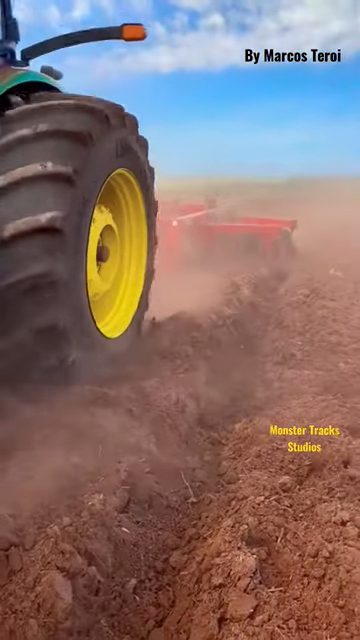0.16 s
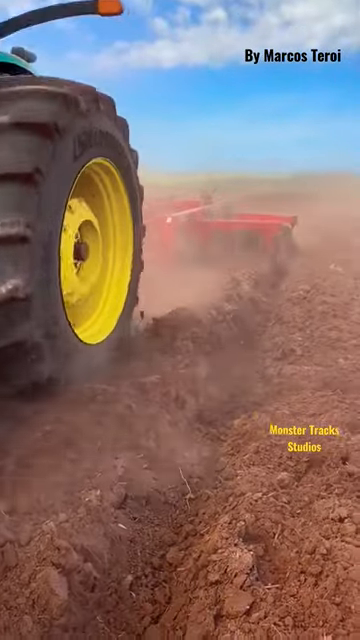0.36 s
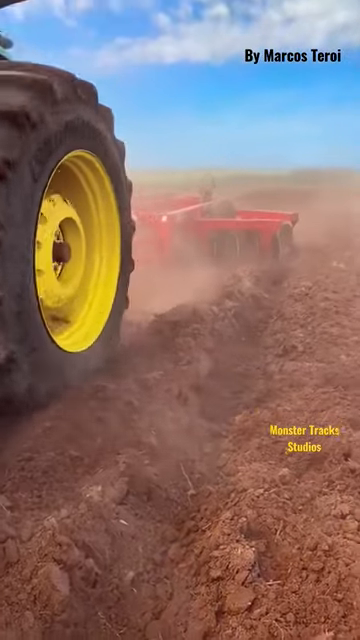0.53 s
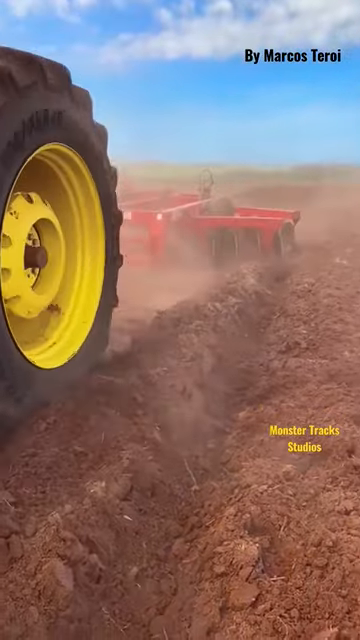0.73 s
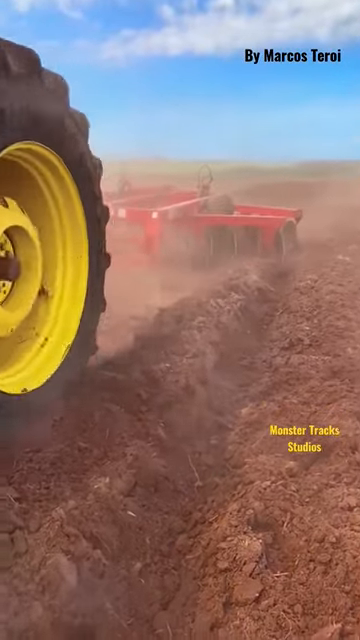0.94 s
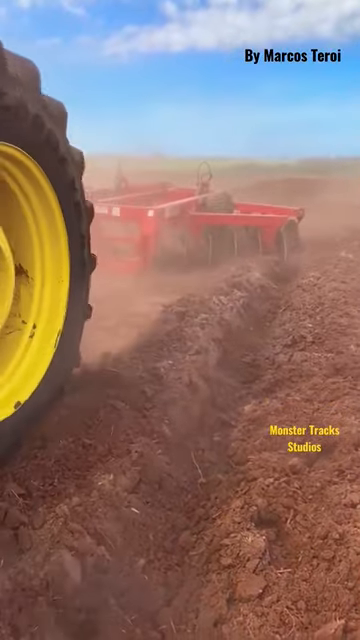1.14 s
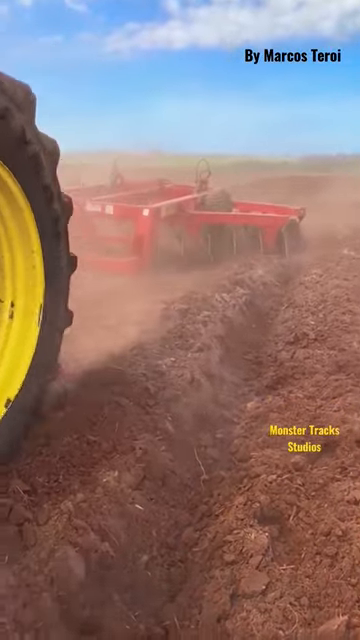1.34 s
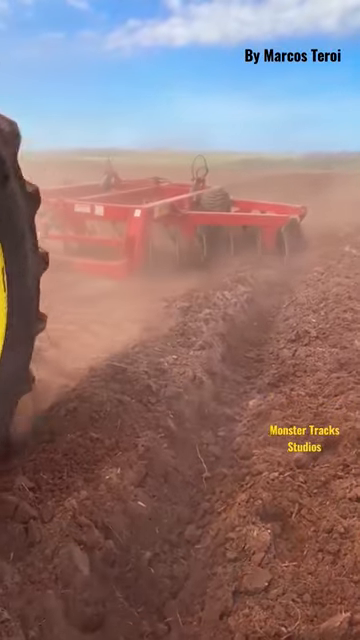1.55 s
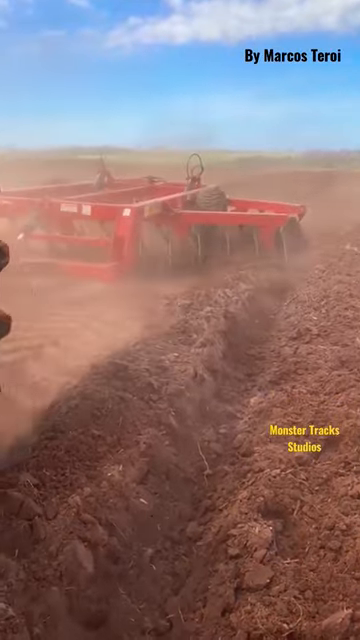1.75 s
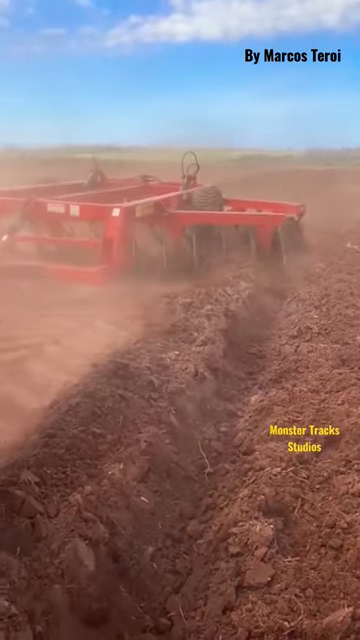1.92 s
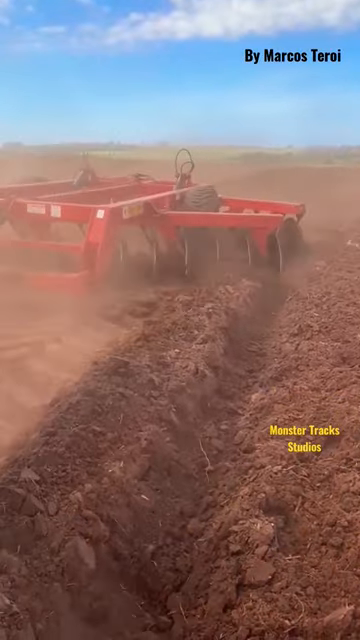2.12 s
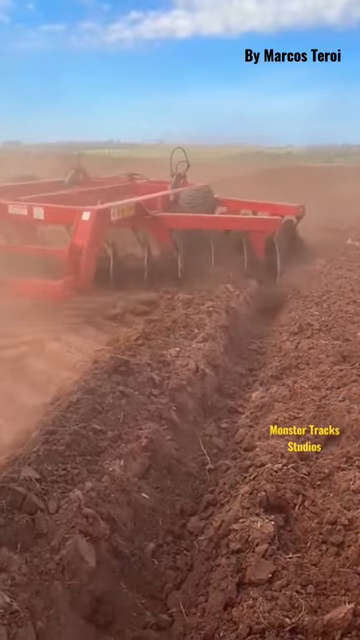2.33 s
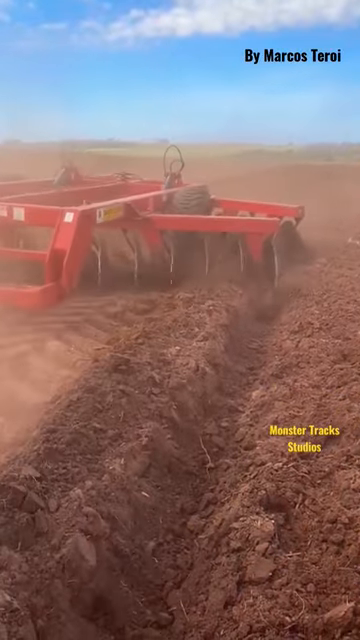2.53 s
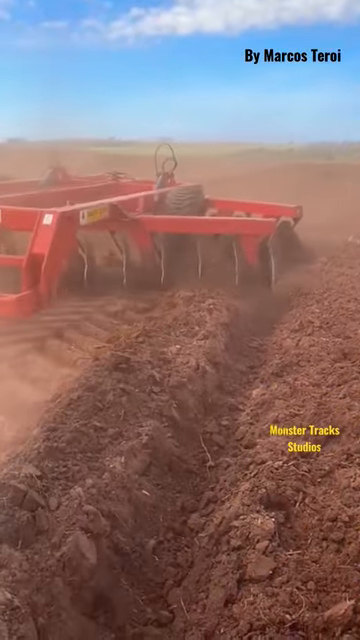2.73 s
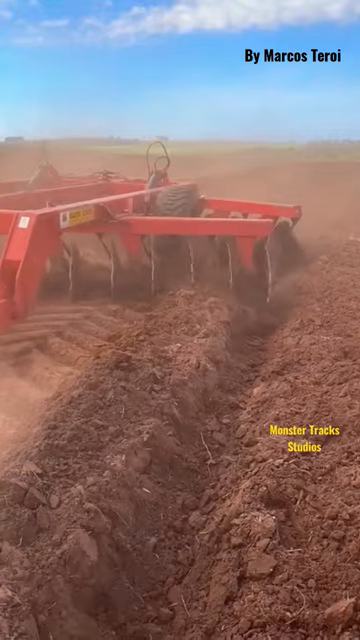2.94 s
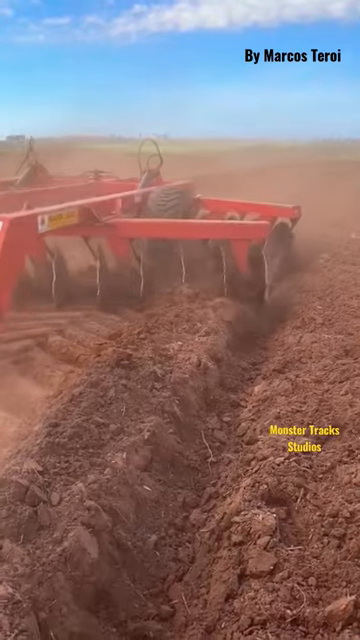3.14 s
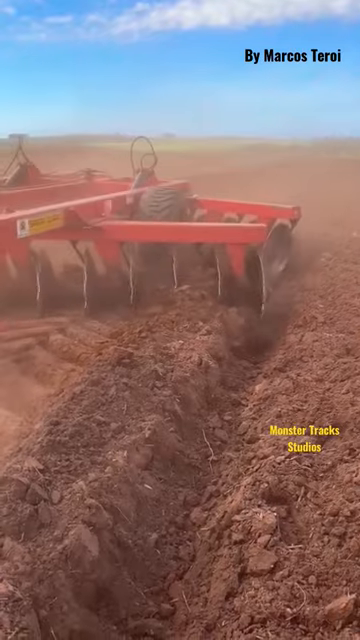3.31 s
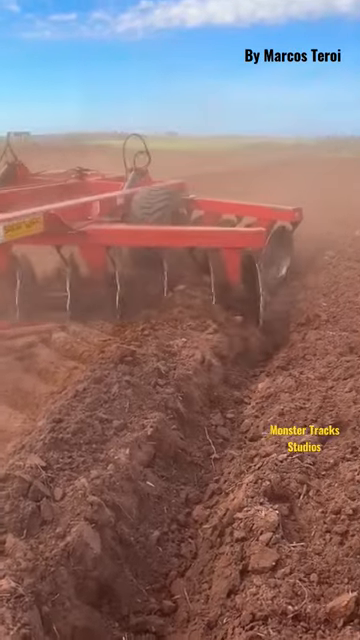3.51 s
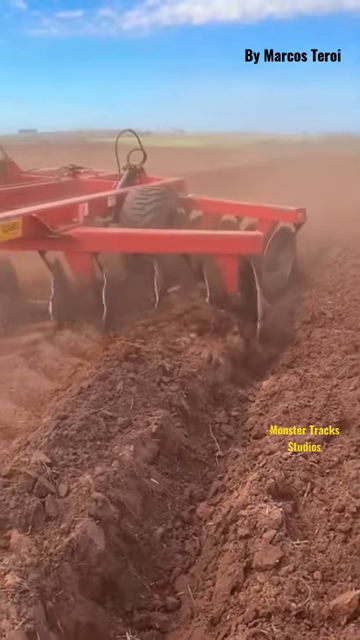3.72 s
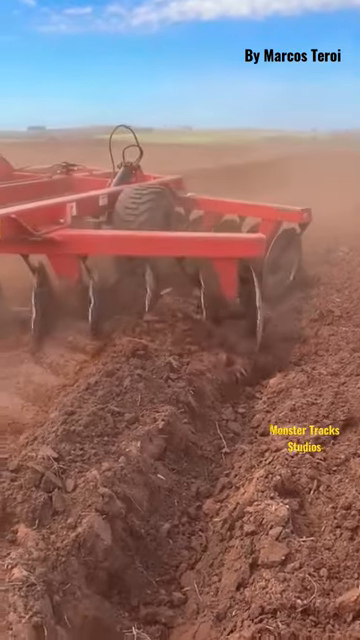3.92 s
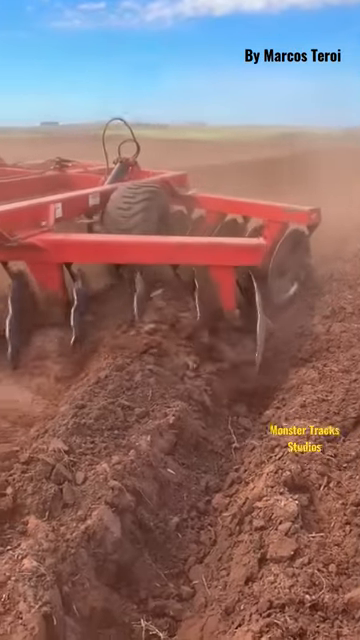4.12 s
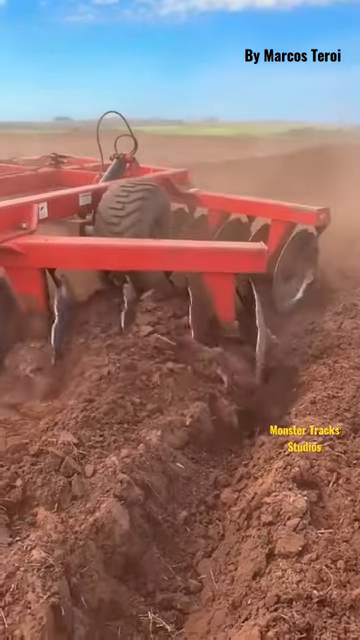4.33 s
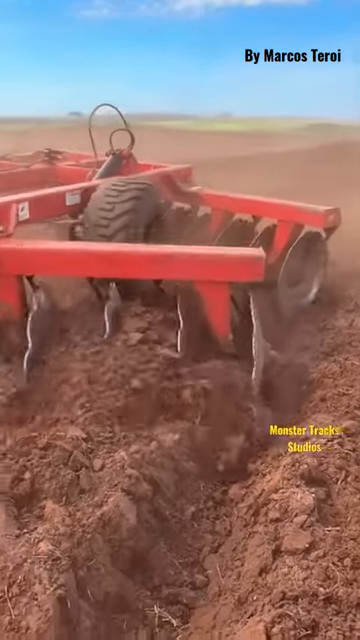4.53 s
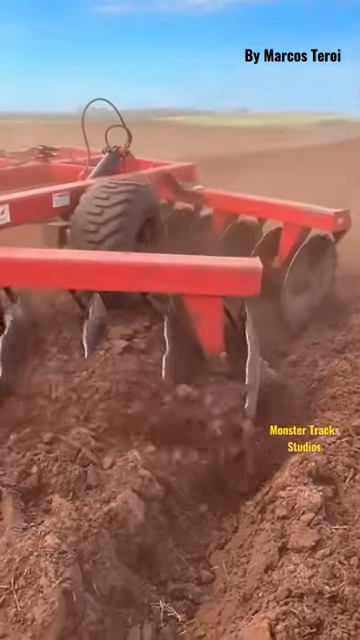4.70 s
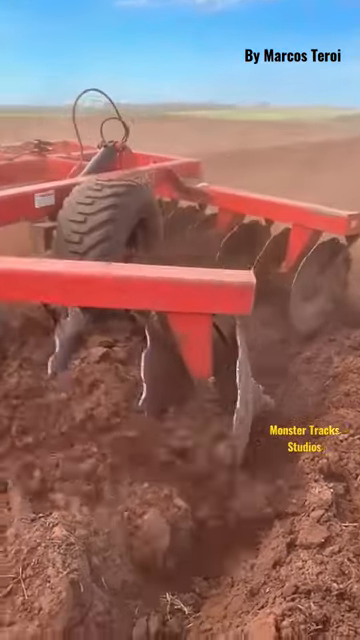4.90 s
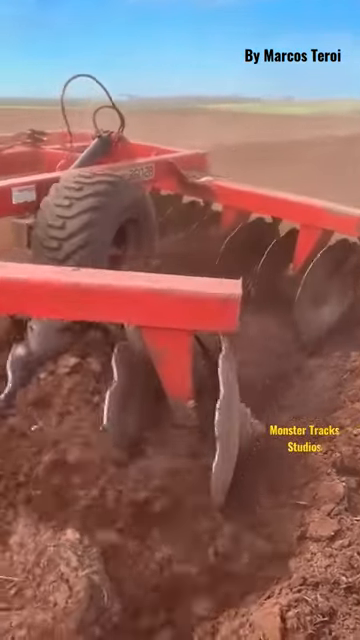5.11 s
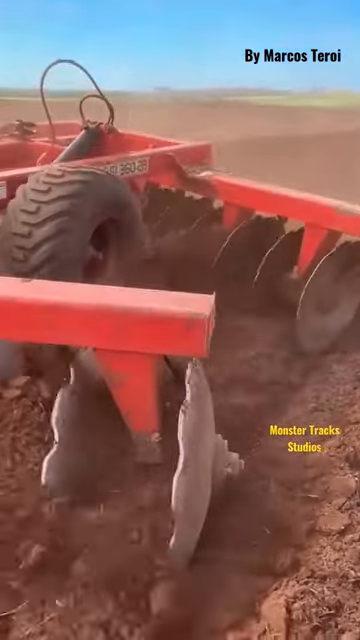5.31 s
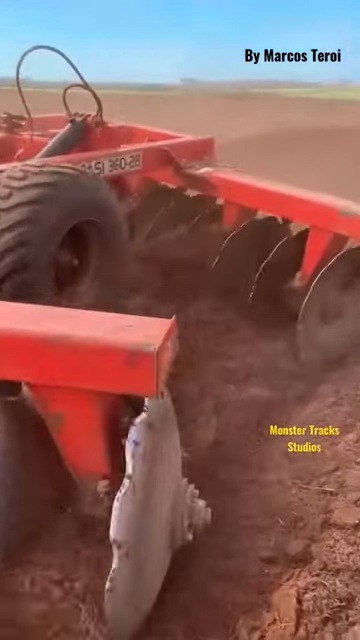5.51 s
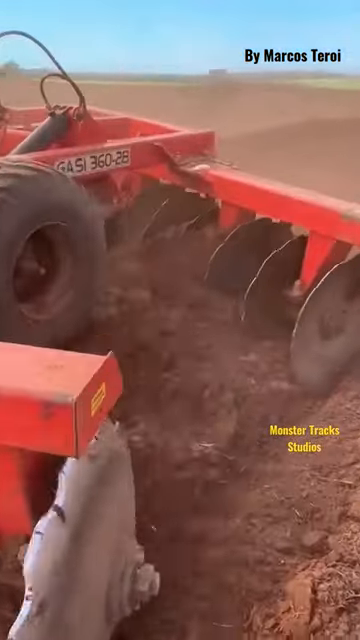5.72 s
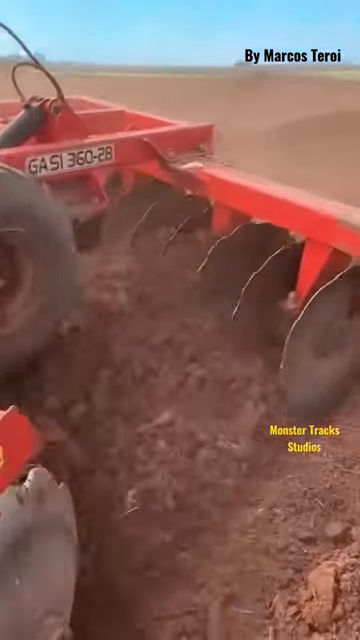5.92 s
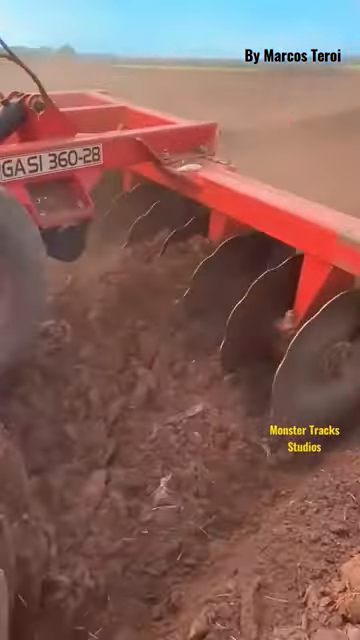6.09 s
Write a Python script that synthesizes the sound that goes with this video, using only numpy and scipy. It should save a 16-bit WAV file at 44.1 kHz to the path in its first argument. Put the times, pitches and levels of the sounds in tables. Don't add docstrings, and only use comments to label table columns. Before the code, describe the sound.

Close tractor pass-by in an open field: deep even engine drone, gear whine and metal clatter fading off, with wind buffets and a sharp clod knock.

```python
import sys
import numpy as np
from scipy import signal
from scipy.io import wavfile
from scipy.ndimage import uniform_filter1d

SR = 44100
rng = np.random.default_rng(int(sys.argv[2]) if len(sys.argv) > 2 else 0)


def dump_mix(stems):
    frames = np.atleast_2d(stems).T
    limited = np.clip(frames, -1, 1)
    pcm = np.round(limited * 32767).astype(np.int16)
    wavfile.write(sys.argv[1], SR, pcm)


def makeup_ratio(level_db):
    decades = np.asarray(level_db, float) / 20
    return 10 ** decades


N = 271214


def rms_one(x):
    return x / np.sqrt(np.mean(x ** 2) + 1e-20)


def in_time(rows):
    s, *columns = np.transpose(rows)
    return [np.interp(np.arange(N) / SR, s, c) for c in columns]


def at_hz(points, hz):
    f, value = np.transpose(points)
    return np.interp(np.log(hz), np.log(f), value)


def drift(rate):
    r = np.exp(-80 * np.pi * rate / SR)
    slow = signal.lfilter([1], [1, -2 * r, r * r], rng.standard_normal(N // 40 + 2002))[2000:]
    return np.interp(np.arange(N) / 40, np.arange(len(slow)), rms_one(slow))


def band(x, low_hz, high_hz):
    sos = signal.butter(2, [low_hz, min(high_hz, .45 * SR)], "band", fs=SR, output="sos")
    return signal.sosfilt(sos, x)


def late(x, ms):
    return np.interp(np.arange(N) - ms * SR / 1000, np.arange(N), x)


def hump(middle_s, length_s):
    t = np.arange(0, N + 64, 64) / SR
    return np.repeat(np.cos(np.pi * np.clip((t - middle_s) / length_s, -.5, .5)) ** 2, 64)[:N]


def fade(t, middle_s, width_s):
    return 1 / (1 + np.exp((t - middle_s) / width_s))


def tone(turns, db, wobble_db, wobble_rate):
    level = makeup_ratio(db + wobble_db * drift(wobble_rate))
    return np.sqrt(2) * level * np.sin(2 * np.pi * (turns + rng.random()))


def from_left(x):
    shadow_hz, port_lag_ms = 506, 0.21
    shaded = signal.sosfilt(signal.butter(1, shadow_hz, fs=SR, output="sos"), x)
    return np.array([x * makeup_ratio(-2.5), late(0.53 * shaded + 0.067 * x, port_lag_ms)])


# (t/s, f of order 12/Hz, level/dB)
CRANK = [(0, 172.2, -18.5), (.35, 172.3, -17.5), (.65, 173.5, -22), (.85, 173.3, -22.5),
         (1.1, 171.5, -26.5), (1.25, 169.3, -22), (1.5, 167.5, -19.5), (1.8, 168.9, -21), (2.2, 170.6, -29),
         (2.55, 170.2, -26), (2.9, 169.8, -22.5), (3.4, 169.3, -21), (4.1, 170.4, -20), (4.52, 171, -24.5),
         (4.9, 170, -21.5), (5.4, 170.6, -24), (5.8, 172, -27.5), (6.15, 172.8, -32)]


def engine(loss_db):
    drone_hz, drone_db = in_time(CRANK)
    cycles = np.cumsum(drone_hz) / SR / 12
    drone = exhaust_drone(cycles, drone_db)
    lows = np.array([drone * makeup_ratio(.15), late(drone * makeup_ratio(-.15), .12)])
    sides = knocks(cycles, loss_db) + gear_mesh(cycles, loss_db) + squeals()
    return lows + from_left(sides), cycles


SIDE_ORDERS = {7: -26, 10: -25, 11: -18, 13: -21.5, 14: -23.5, 15: -17.5, 17: -22.5, 18: -20.5}


def exhaust_drone(cycles, drone_db):
    out = tone(12 * cycles, drone_db, 0.067, 3.5)
    out += tone(3 * cycles, -37.5, 0.74, 4.48)
    out += tone(6 * cycles, swollen(6, -43), 0.96, 6.2)
    for order, db in SIDE_ORDERS.items():
        out += tone(order * cycles, drone_db + db, 2.36, 1.0)
    return out


# (share of the cycle, level/dB)
FIRINGS = [(.04, -3), (.125, -7), (.242, 0), (.46, -10), (.60, -4), (.84, -10)]
# (f/Hz, width/Hz, level/dB)
RESONANCES = [(255, 35, -14), (392, 40, 0), (436, 50, -2), (482, 60, -6), (550, 90, -5), (650, 120, -4),
              (760, 120, -11), (960, 120, -17), (1400, 200, -23)]
# (t/s, extra delay/ms, strength 0-1)
GROUND_ECHO = [(0, 4.73, 1), (1.5, 4.49, 0.77), (3, 4.34, 0.81), (4.5, 3.4, 0), (6.15, 2.626, 0.53)]
# (middle t/s, length/s, extra level/dB)
PULLS = [
    (1.724, .7, -7),
    (2.505, 0.3, -0.5),
    (3.508, 0.83, 3.5),
    (5.425, 3.7, 6.5),
]


def knocks(cycles, loss_db):
    hits = np.zeros(N)
    for share, db in FIRINGS:
        at = np.flatnonzero(np.diff(np.floor(cycles - share)))
        hits[at] -= makeup_ratio(db + 1.3 * rng.standard_normal(len(at)))
    body = np.zeros(N)
    for hz, width_hz, db in RESONANCES:
        r = np.exp(-np.pi * width_hz / SR)
        poles = [1, -2 * r * np.cos(2 * np.pi * hz / SR), r * r]
        rung = signal.lfilter([0, 1], poles, hits + 1e-18)
        body += makeup_ratio(db + 1.5 * drift(.8)) * rms_one(rung)
    echo_ms, strength = in_time(GROUND_ECHO)
    body = band(body + strength * late(body, echo_ms), 350, 1300)
    knock_db = -23 + 1.127 * loss_db + sum(db * hump(s, length) for s, length, db in PULLS)
    return makeup_ratio(knock_db + 2.5) * rms_one(body)


GEARS = {27: (-38.5, .5), 30: (-36, 0.33), 38: (-34, 0.64), 44: (-31.5, 1.5), 48: (-33, 0.41),
         64: (-41.5, 0.68), 97: (-32.5, 0.73)}


def gear_mesh(cycles, loss_db):
    out = np.zeros(N)
    for order, (db, follows) in GEARS.items():
        wavering = cycles + 0.0016 * drift(11.4)
        out += tone(order * wavering, swollen(order, db + follows * loss_db), 2.46, 15.0)
    return out


SWELLS = {64: [(2.1, 1, -39), (5.2, 0.45, -42)], 27: [(3.5, 1.0, -36), (5.3, 1.7, -40.5)],
          30: [(2.2, 0.74, -34), (3.5, 1.2, -38)], 6: [(.2, .8, -35), (.95, 0.32, -29), (1.4, 0.55, -32),
          (1.8, 0.44, -30), (2.2, 0.29, -30.5), (2.7, .5, -33), (3.3, 1, -36), (4.4, 0.35, -37),
          (6.15, 0.68, -32.5)], 38: [(1.4, 0.46, -37), (2.1, 1.3, -34), (2.8, 0.62, -34.5),
          (5.2, 2.57, -36.5)], 44: [(1.6, .4, -29.5), (2.9, 1, -43), (4.5, 1, -42)], 48: [(.8, 0.21, -29),
          (1.5, 1, -32), (1.95, 0.25, -38), (2.4, 0.2, -34), (3.4, 0.38, -35), (3.95, 0.67, -32.5),
          (4.65, 0.41, -43.5), (5.15, 0.41, -43)], 97: [(.35, 0.43, -39.5), (2.1, 0.9, -43),
          (3.0, 0.74, -52)]}


def swollen(order, db):
    swells = sum(makeup_ratio(peak_db) * hump(s, length) for s, length, peak_db in SWELLS[order])
    return 20 * np.log10(makeup_ratio(db) + swells)


# (start t/s, length/s, f/Hz, level/dB)
SQUEALS = [
    (1.16, 0.57, 2030, -35),
    (0.99, 0.26, 960, -35),
    (1.22, 0.45, 1030, -30.5),
    (1.25, 0.46, 950, -36),
    (1.96, 0.34, 1068, -32),
    (2.175, 0.19, 2200, -38),
    (0.56, .25, 3390, -35),
    (4.55, 0.33, 940, -44),
]


def squeals():
    t, out = np.arange(N) / SR, np.zeros(N)
    for s, length, hz, db in SQUEALS:
        swell = np.sin(np.pi * np.clip((t - s) / length, 0, 1)) ** .5
        jitter = np.cumsum(9.0 * drift(22)) / SR
        out += swell * tone(hz * t + jitter, db, 5.3, 15.0)
    return out


# (t/s, f/Hz, level/dB)
FAN = [(0, 140.2, -25.5), (.6, 140.8, -25.5), (1.1, 137.3, -30), (1.5, 126, -33.5), (2, 126.6, -32),
       (2.6, 124, -43), (3.1, 120.5, -35), (3.45, 110.8, -41), (3.7, 124.4, -32.5), (3.95, 139.5, -31.5),
       (4.6, 140.4, -32.5), (5.3, 136, -35.5), (6.15, 133.5, -36.5)]


def fan():
    hz, db = in_time(FAN)
    return tone(np.cumsum(hz) / SR, db, 1.4, 4.7)


def whine(rows, waver_hz):
    t, out = np.arange(N) / SR, 0
    for s, length, first_hz, last_hz, db in rows:
        hz = np.interp(t, [s - length / 2, s + length / 2], [first_hz, last_hz])
        turns = np.cumsum(hz + waver_hz * drift(30)) / SR
        out = out + hump(s, length) * tone(turns, db, 3, 5)
    return out


# (middle t/s, length/s, first f/Hz, last f/Hz, peak level/dB)
TURBO = [
    (.1, 2.6, 5800, 5790, -55),
    (3.35, 3.0, 5770, 5880, -54),
    (5.3, 3.0, 5870, 5870, -66),
]
# (middle t/s, length/s, first f/Hz, last f/Hz, peak level/dB)
PUMP = [
    (.9, 3.8, 3440, 3335, -50),
]


def whines():
    return whine(TURBO, 13) * [[1.3], [-.1]] + whine(PUMP, 12.8) * [[1.1], [.6]]


def per_cycle(cycles):
    size = 3100
    patterns, turn = rng.standard_normal((2, 2, 2, size)), 0.82 * drift(0.65)
    at = (cycles % 1 * size).astype(int)
    return np.cos(turn) * patterns[0][..., at] + np.sin(turn) * patterns[1][..., at]


ZONE_TOPS_HZ = 750, 2300, 7400
# (tractor level abreast/dB, share of the loss, steady soil level/dB, extra level of first air blast/dB)
ZONES = [
    (-24.5, 0.87, -37, 3),
    (-25.5, 0.87, -52.5, 1),
    (-33, 1.02, -49.5, 7),
    (-38, 1.58, -56.5, 10),
]
# (f/Hz, level per Hz/dB)
NEAR_COLOUR = [(40, -10), (110, -25.5), (250, -1), (400, -17.5), (650, -2), (1200, -18), (2000, -19.5),
               (3100, -23.5), (5000, -28.5), (6500, -24), (8500, -36.5), (11500, -30.5), (13500, -32),
               (15500, -39)]
# (f/Hz, level per Hz/dB)
FAR_COLOUR = [(40, -0.5), (110, -2), (250, -9), (400, -5.5), (650, -10.5), (1200, -17), (2000, -24),
              (3100, -34), (5000, -32), (6500, -51), (8500, -40), (11500, -41.5), (13500, -36.5),
              (15500, -49.5)]
# (f/Hz, share 0-1)
LEAN = [(100, .2), (300, 0.63), (700, 1), (1300, 0.52), (2400, 0.59), (4000, 0.057)]
# (f/Hz, level/dB)
NEAR_SIDE = [(60, -20), (200, -52), (380, -24), (690, 5), (1300, -3.5), (2400, -3.5), (4300, 8), (6000, 2),
             (8500, -2.5), (12000, 2.5), (15000, -9)]
# (f/Hz, level/dB)
FAR_SIDE = [(60, -38), (200, -21.5), (380, -37), (690, 1), (1300, 0.5), (2400, 7), (4300, 0), (6000, 3),
            (8500, -2), (12000, 0), (15000, -1.5)]


def clatter(cycles, loss_db):
    near = np.clip(1 + 2.14 * loss_db, 0.15, 1)
    blast = np.exp(-np.arange(N) / SR / 0.33)
    pulse = np.cos(2 * np.pi * 6 * cycles) + .6 * np.cos(2 * np.pi * cycles)
    white, together = rng.standard_normal((2, 2, N)), drift(17.0)
    repeats = 0.68
    locked = np.sqrt(repeats) * per_cycle(cycles) + np.sqrt(1 - repeats) * white
    edges = 40 * 2 ** (np.arange(27) / 3)
    zones = np.zeros((4, 2, N))
    for k, (low, high) in enumerate(zip(edges, edges[1:])):
        hz = np.sqrt(low * high)
        source = locked if 300 < hz < 2300 else white
        mid, other = band(source[k % 2], low, high)
        lean = at_hz(LEAN, hz)
        side = lean * late(mid, -0.079) + np.sqrt(1 - lean ** 2) * other
        side = side * makeup_ratio(near * at_hz(NEAR_SIDE, hz) + (1.5 - near) * at_hz(FAR_SIDE, hz))
        colour_db = near * at_hz(NEAR_COLOUR, hz) + (1 - near) * at_hz(FAR_COLOUR, hz)
        gain = makeup_ratio(colour_db + 0.35 * together + 1.48 * drift(27.0) + 0.15 * pulse)
        ports = np.array([mid + side, mid - side]) / np.std(mid + side)
        zones[np.searchsorted(ZONE_TOPS_HZ, hz)] += gain * ports * np.sqrt(hz)
    out = np.zeros((2, N))
    for zone, (db, follows, soil_db, blast_db) in zip(zones, ZONES):
        even = np.sqrt(uniform_filter1d(zone[0] ** 2, size=SR // 2))
        level = np.hypot(makeup_ratio(db + follows * loss_db + blast_db * blast), makeup_ratio(soil_db))
        out += zone / even * level
    return out


# (t/s, peak level/dB, low edge f/Hz, t60/s)
CLODS = [(2.3915, -39, 3000, .03), (3.1462, -42, 3000, .03), (4.11, -42, 8000, .04), (4.484, -22, 750, .06),
         (4.484, -28, 4500, .055), (5.005, -37, 2500, .03), (5.094, -39, 2500, .03), (5.29, -39, 5000, .13),
         (5.28, -38, 2000, .04), (5.35, -40, 3500, .06), (6.0072, -42, 3000, .03), (6.0531, -43, 3000, .03)]


def clods():
    out, t = np.zeros((2, N)), np.arange(SR // 5) / SR
    for s, db, low_hz, t60 in CLODS:
        grit = rms_one(band(rng.standard_normal((2, len(t))), low_hz, min(low_hz * 4.5, 13000)))
        envelope = makeup_ratio(db - 6 - 60 * t / t60) * (1 - np.exp(-t / .002))
        burst = envelope * (grit * .8 + .3 * grit[0])
        i = round(s * SR)
        out[:, i:i + len(t)] += burst[:, :N - i]
    return out


# (middle t/s, length/s, common level/dB, opposed level/dB)
GUSTS = [(0, 0.21, -41, -30), (1.178, 0.34, -37, -39), (1.732, 0.35, -23, -32), (1.957, 0.17, -37, -31),
         (2.95, 0.37, -38, -56), (5.749, 0.31, -36.5, -59), (1.836, 0.2, -28, -31),
         (2.104, 0.38, -26.5, -32.5), (2.36, 0.43, -32.5, -25), (2.603, 0.38, -38, -20.5),
         (2.703, 0.49, -31, -42), (3.3, 0.42, -40, -47), (4.985, .15, -50.5, -45), (2.2, 0.88, -32.5, -44)]


def wind():
    draught = makeup_ratio(-29) * fade(np.arange(N) / SR, 1.46, 0.1)
    common_gain = makeup_ratio(-43.5) + draught
    opposed_gain = makeup_ratio(-59) * np.ones(N)
    for s, length, common_db, opposed_db in GUSTS:
        common_gain += makeup_ratio(common_db) * np.sqrt(hump(s, length))
        opposed_gain += makeup_ratio(opposed_db) * hump(s, length)
    common = rms_one(band(rng.standard_normal(N), 45, 170)) * common_gain * makeup_ratio(1.3 * drift(12))
    opposed = rms_one(band(rng.standard_normal(N), 73, 360)) * opposed_gain * makeup_ratio(1.2 * drift(15.0))
    return np.array([common + opposed, common - opposed])


# (low f/Hz, high f/Hz, share of time near, share of time far, turn t/s)
WEAK_MID = [(1900, 2240, 0, .3, 2.2), (2240, 2800, 0, .85, 1.78), (2800, 3150, 0, .55, 2),
            (4450, 4800, .45, 0, 2.3), (4800, 5350, .85, .25, 2.4), (5350, 5700, .5, .2, 1.3),
            (7060, 7300, .72, .45, 2.5), (7300, 7750, .88, .72, 2.5), (9640, 10330, 0, .45, 2.3),
            (12400, 13100, .8, .2, 2.4), (13100, 14000, .25, .1, 2), (14000, 14800, .45, .45, 2),
            (14800, 16000, .84, .78, 2)]


def drop_weak_mid(x):
    mid, side = (x[0] + x[1]) / 2, (x[0] - x[1]) / 2
    hz, s, frames = signal.stft(mid, SR, nperseg=2048)

    def luck_over(size):
        return uniform_filter1d(rng.standard_normal(len(s)), size=size)

    common = luck_over(7)
    for low, high, near_share, far_share, turn_s in WEAK_MID:
        near = fade(s, turn_s, .1)
        luck = common + 1.2 * luck_over(5)
        rank = np.argsort(np.argsort(luck)) / len(s)
        ragged = 90 * uniform_filter1d(rng.standard_normal((2, len(s))), size=2)
        inside = (hz[:, None] >= low - 40 + ragged[0]) & (hz[:, None] < high + 40 + ragged[1])
        silent = rank < (near * near_share + (1 - near) * far_share) * 1.15
        frames[inside & silent] = 0
    for low in [*range(2000, 7100, 170), *range(12400, 15000, 300)]:
        luck = luck_over(4)
        strip = (hz >= low) & (hz < low * 1.04)
        frames[np.ix_(strip, luck < np.quantile(luck, .18))] = 0
    mid = signal.istft(frames, SR)[1][:N]
    return np.array([mid + side, mid - side])


# (t/s, level/dB)
PASSING = [(0, -28), (.5, -28), (1.05, -28), (1.35, -27.5), (1.8, -28.5), (2.1, -33.5), (2.5, -36),
           (3, -37.5), (3.6, -39), (4.2, -42), (4.8, -42.5), (5.5, -42), (6.15, -44)]


def scene():
    loss_db = in_time(PASSING)[0] + 28
    motor, cycles = engine(loss_db)
    field = motor + fan() + whines() + clatter(cycles, loss_db) + wind()
    return drop_weak_mid(field) + clods()


def roll_off(x):
    return signal.sosfilt(signal.butter(12, 15350, fs=SR, output="sos"), x)


def record(dry):
    cut = signal.sosfilt(signal.butter(4, 37, "high", fs=SR, output="sos"), dry)
    return roll_off(cut)


dry = scene()
out = record(dry)
dump_mix(out)
```